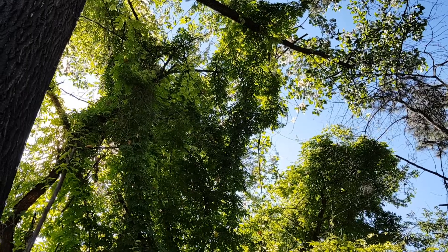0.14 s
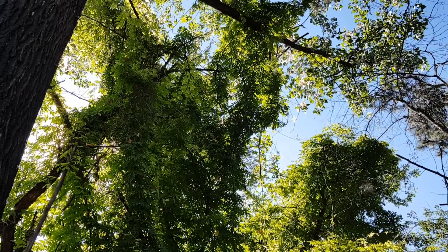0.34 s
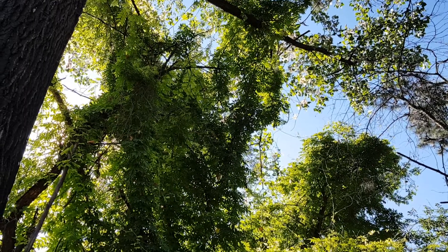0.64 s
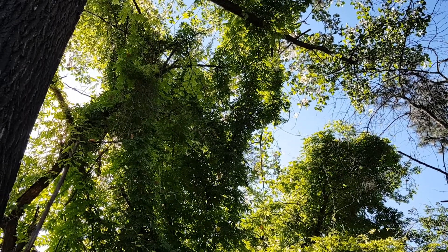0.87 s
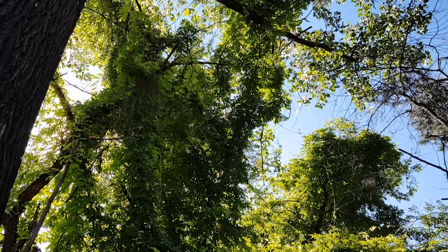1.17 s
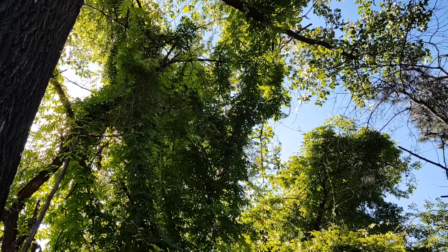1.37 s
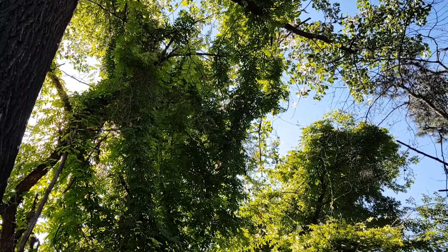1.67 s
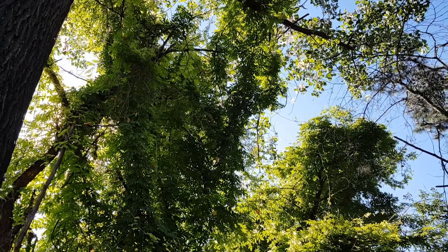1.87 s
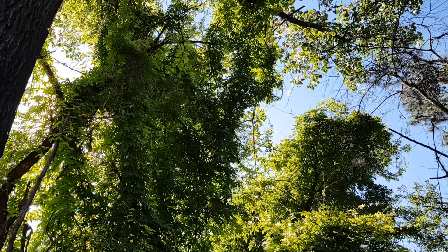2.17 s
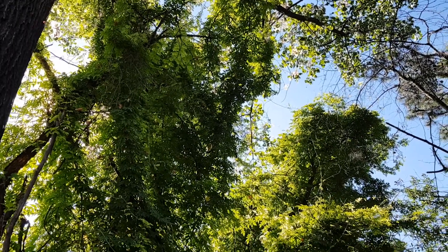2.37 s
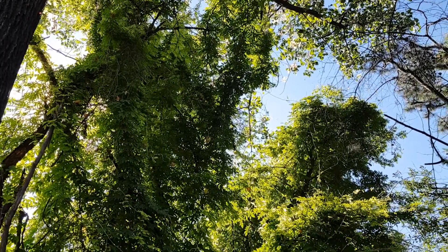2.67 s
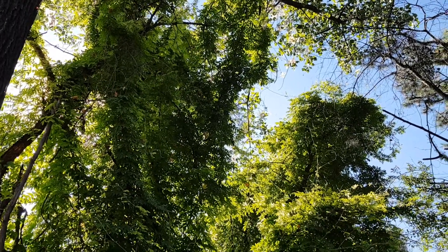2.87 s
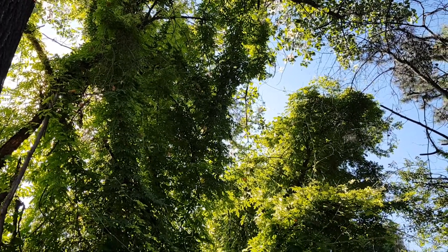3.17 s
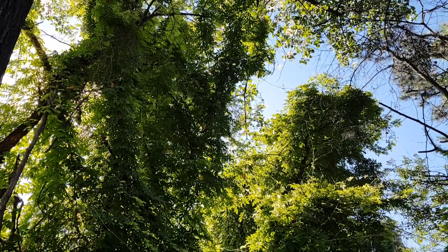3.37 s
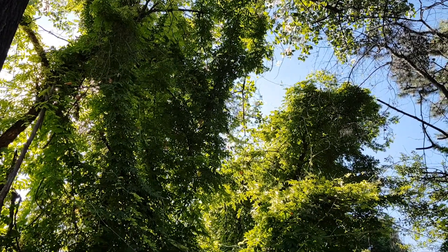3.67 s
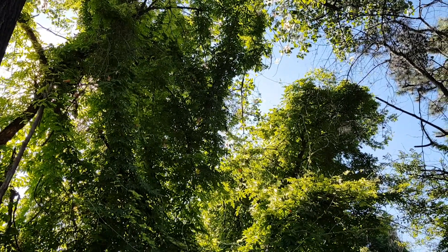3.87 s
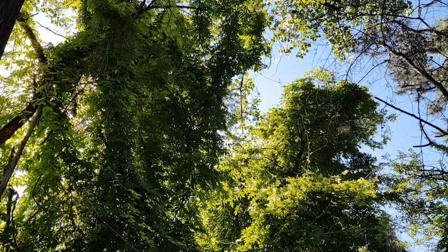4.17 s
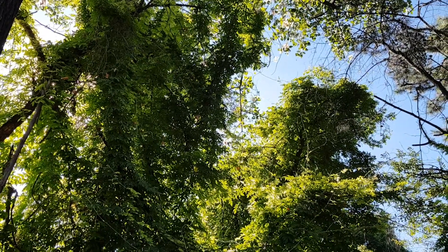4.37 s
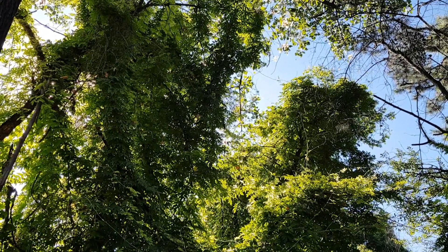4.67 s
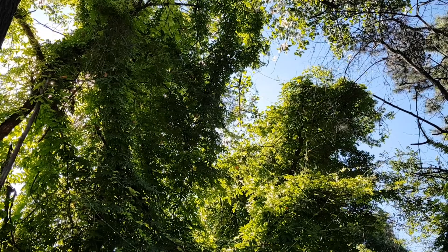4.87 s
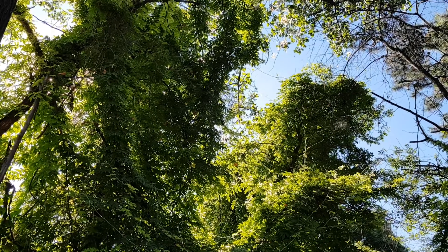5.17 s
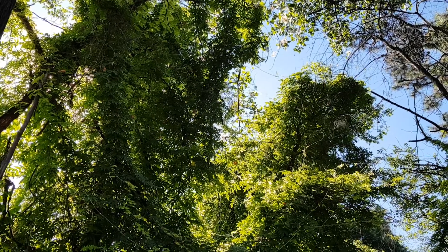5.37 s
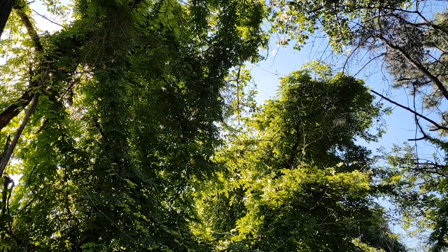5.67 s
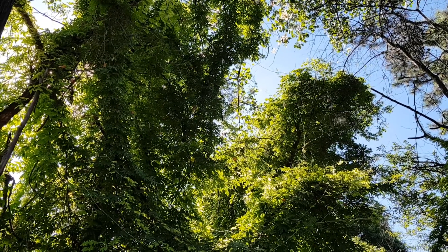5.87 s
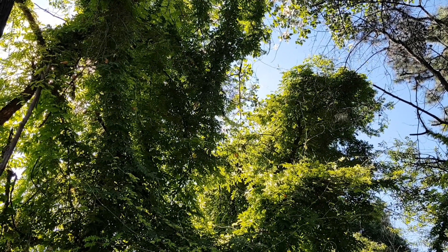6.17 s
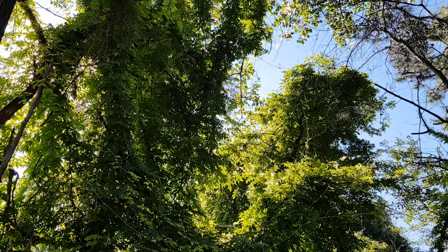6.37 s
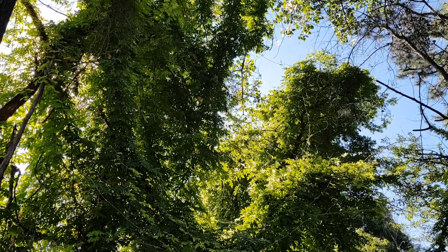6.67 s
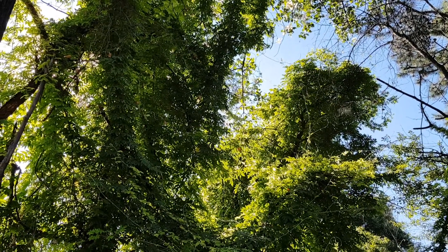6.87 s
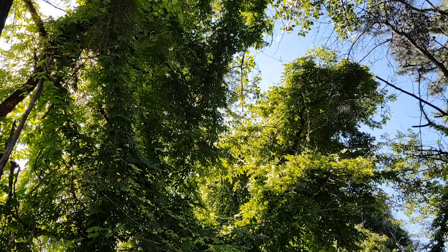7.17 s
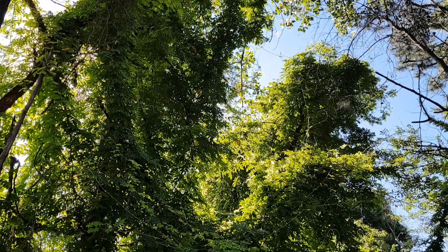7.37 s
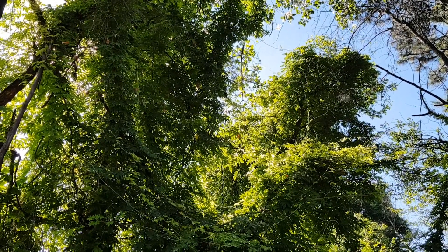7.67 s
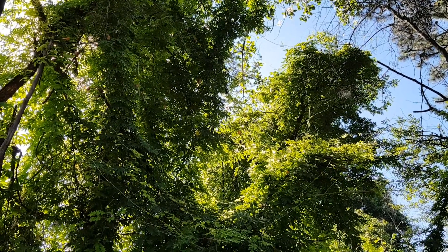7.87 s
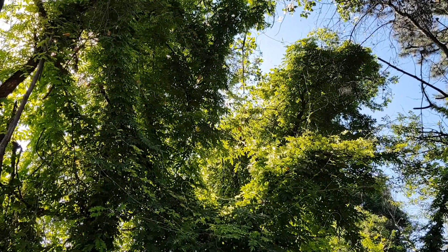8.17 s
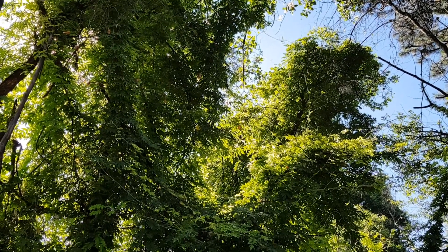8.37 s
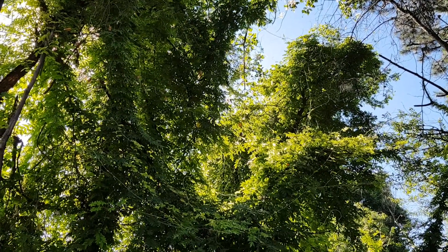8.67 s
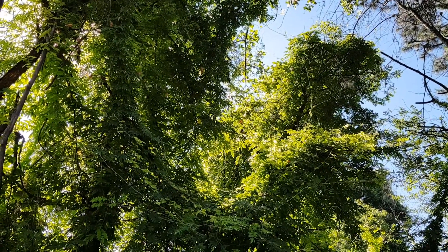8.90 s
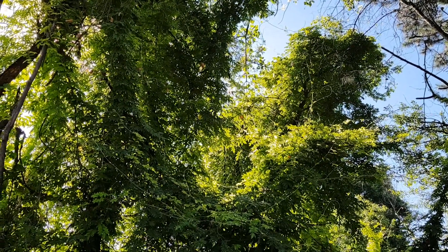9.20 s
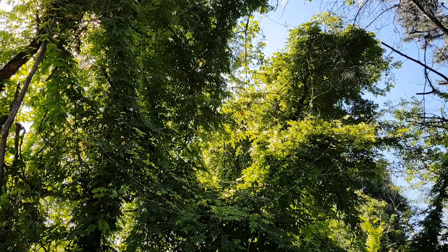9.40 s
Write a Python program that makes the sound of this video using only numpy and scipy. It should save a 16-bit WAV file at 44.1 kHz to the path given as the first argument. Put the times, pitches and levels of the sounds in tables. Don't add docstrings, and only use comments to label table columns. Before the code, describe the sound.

Two spaced microphones under vine-covered trees pick up close cicadas: metallic, needle-like buzzing at around two hundred pulses a second, alternating with lower reedy notes. Short exchanges give way to a sustained song that tires into rattle, then a quieter stretch where the distant chorus shows, then the loudest long song, slowing and unsteady to the end. A faint machine whine, low traffic and brief soft wind thumps lie far below.

```python
import sys
import numpy as np
from scipy import signal
from scipy.fft import rfft, irfft, next_fast_len
from scipy.io import wavfile
from scipy.ndimage import uniform_filter1d, map_coordinates

SR = 44100
rng = np.random.default_rng(int(sys.argv[2]) if len(sys.argv) > 2 else 0)


def store_pcm(level_fs):
    pcm = np.round(np.clip(level_fs, -1, 1) * 32767).astype(np.int16)
    wavfile.write(sys.argv[1], SR, np.atleast_2d(pcm).T)


def volts_from_db(level):
    exponent = np.asarray(level, float) / 20
    return 10 ** exponent


N = 420713

SPACING = 0.167

# (frequency [Hz], level [dB per Hz])
HUM_SPECTRUM = [(12, -52), (20, -8), (43, -2.5), (108, 1), (190, -3.5), (232, -0.5), (357, -8.5), (409, -8),
                (500, -13.5), (650, -15.5), (1100, -120)]
# (frequency [Hz], level [dB per Hz])
RUSTLE_SPECTRUM = [(180, -39), (300, -31), (389, 8.5), (436, -25), (484, 9), (716, 7), (1400, 4),
                   (2400, -4), (3120, -89), (5280, -120)]
HUM_DB, RUSTLE_DB = -51, -56
RUSTLE_FADE = 1.47

# (peak time [s], width [s], level [dB], lower octave level [dB])
WHINE_SWELLS = [(2.1, 0.16, -65, -77), (2.7, 0.24, -57.5, -62), (3.13, 0.064, -59, -85),
                (3.36, 0.064, -59, -84), (3.6, 0.1, -52, -76), (3.76, 0.052, -60, -62),
                (3.98, 0.15, -58, -80), (4.33, .15, -64, -78)]
# (time [s], frequency [Hz])
WHINE_PITCH = [(1.98, 1510), (2.5, 1552), (2.75, 1543), (3.15, 1531), (3.45, 1523), (4.15, 1527),
               (4.55, 1495)]
TWIN_HZ, TWIN_DB = 16, -68.5

# (start [s], end [s], frequency [Hz], level [dB])
FAR_NOTES = [(0, .92, 80.8, -52), (1.502, 1.75, 2040, -60), (2.85, 2.97, 2600, -50.5), (3, 3.6, 240, -61.5),
             (3.3, 3.6, 2640, -54.5), (6.99, 7.606, 399, -68.5), (7.2, 7.37, 3850, -44),
             (7.39, 7.56, 3430, -43.5), (8.007, 8.695, 388, -67), (8.6, 8.712, 4480, -38),
             (8.9, 9.547, 393.5, -70), (9.45, 9.6, 5280, -38), (9.49, 9.6, 5080, -43)]
FLUTTER_DB = 1.5

# (start [s], left level [dB], right level [dB], length [s])
WIND_PUFFS = [(0.876, -48, -41.5, 0.16), (1.157, -52, -46, 0.11), (1.857, -52, -47, 0.036),
              (4.526, -56, -45, 0.092), (5.413, -48, -64, .06), (5.637, -28, -39, 0.057),
              (6.076, -40.5, -56, 0.067), (6.473, -58, -41.5, 0.14), (6.768, -47, -40, 0.1),
              (7.002, -46, -56, 0.23), (7.2, -62, -55, 0.12), (7.36, -48, -54, 0.16),
              (7.506, -52, -62, 0.15), (7.757, -43.5, -55, 0.061), (8.28, -60, -49, 0.042)]

# (frequency [Hz], level [dB per Hz])
DEEP_SPECTRUM = [(880, -83), (1500, -30), (1850, -23.5), (2810, -8), (3570, 2), (4700, 4), (5520, -10.5),
                 (6520, -6), (7400, -13.5), (9620, -41), (16300, -120)]
# (frequency [Hz], level [dB per Hz])
THIN_SPECTRUM = [(4120, -48), (7000, -41), (7160, -36), (7450, -9), (7860, -4), (8560, -1), (9130, -3),
                 (10400, -19), (11500, -18.5), (15000, -36), (22000, -120)]
# (frequency [Hz], level [dB per Hz])
HAZE_SPECTRUM = [(4500, -14), (5500, 3.5), (7000, -2.5), (10000, -10), (11500, 1), (15800, 0.5)]
# (time [s], level [dB])
DEEP_SWELL = [(0, -33.5), (1.35, -33), (1.6, -30), (2.1, -32), (2.5, -32), (3.35, -34.5), (3.75, -32),
              (4.05, -34.5), (4.4, -31.5), (5, -37.5), (5.75, -33.5), (6.5, -34.5), (7, -34.5),
              (7.65, -32.5), (8.4, -33), (9.2, -32.5), (9.54, -31.5)]
# (time [s], level [dB])
THIN_SWELL = [(0, -38), (1.3, -39.5), (1.6, -36), (3.7, -35), (5.8, -35.5), (7.6, -37.5), (9.54, -36)]
HAZE_DB, HAZE_FOLLOWS, HAZE_LAG_S = -37, 0.62, 0.48

# (time [s], rate [cycles a second])
SHRILL_BEAT = [
    [(0, 202.5), (.9, 202), (1.26, 201.7), (1.85, 199.6)],
    [(1.85, 214.6), (2.67, 208.7), (2.95, 203.3), (3.3, 196), (4.75, 165)],
    [(4.75, 191.5), (5.2, 190.5), (5.3, 207.1), (5.88, 202.3)],
    [(5.85, 211), (6.25, 206.2), (6.9, 202.3), (7.3, 197.2), (7.42, 191), (7.51, 192.4), (7.7, 182),
     (8.4, 162), (9.54, 150)],
]
# (time [s], rate [cycles a second])
LOW_BEAT = [
    [(0, 205), (.7, 204.4), (1.25, 203)],
    [(1.25, 202.4), (1.62, 201.5)],
    [(1.55, 214.9), (2, 214.4)],
    [(1.7, 198.5), (2, 199), (2.15, 191), (2.4, 185), (3.5, 170)],
    [(4.55, 191.8), (5.35, 190.3)],
    [(5.45, 212.8), (5.78, 212.5), (5.98, 210.9)],
]
# (start [s], end [s], level [dB], sag [dB a second])
SHRILL_HOLDS = [
    [(0, .16, -26.5, -10), (.385, .55, -26, 0), (.79, .94, -26, 5), (1.15, 1.335, -31, -13),
     (1.59, 1.705, -29, -13)],
    [(1.97, 3.93, -31, 1.2), (3.93, 4.08, -35, 28), (4.08, 4.7, -40, 6)],
    [(4.9, 5.08, -43, 10), (5.33, 5.88, -38, -2)],
    [(5.94, 7, -26, -1), (7, 8.45, -25.5, 2), (8.45, 8.9, -28, 19), (9.03, 9.2, -29.5, 20),
     (9.25, 9.48, -37.5, 7)],
]
# (start [s], end [s], level [dB], sag [dB a second])
LOW_HOLDS = [
    [(.205, .305, -28.5, 14), (.585, .68, -29, -18), (.98, 1.07, -28.5, -26)],
    [(1.401, 1.524, -28, 27.78)],
    [(1.68, 1.904, -32, 7)],
    [(1.8, 1.98, -30, 3), (2.16, 3.35, -34, 6.5)],
    [(4.68, 4.82, -42.5, 5), (5.13, 5.25, -40.5, -19)],
    [(5.56, 5.7, -44, -56), (5.686, 5.9, -32, -4)],
]
# (right microphone delay [ms], left over right [dB], leaf echoes [dB], brightness [dB per octave])
SHRILL_PERCH = [
    (0.06, 0.5, -3, -0.5),
    (-0.085, 1, 3, 15.5),
    (0, -1, 17, 11),
    (0.168, 0, -1, 4.5),
]
# (right microphone delay [ms], left over right [dB], leaf echoes [dB], brightness [dB per octave])
LOW_PERCH = [
    (0.072, .3, -4.5, 1),
    (0.077, .3, -2.5, 2.5),
    (-0.097, 0.33, -3, 4),
    (0.081, 2.4, 1.5, -4),
    (0.0081, 1.5, 7, 4),
    (0.084, 1.8, 1, 11.5),
]
# (scatter of a cycle [us], tires below [cycles a second], second tymbal follows [ms])
SHRILL_NERVE = [
    (3, 190, 2.6),
    (4.5, 207, 2.45),
    (6, 180, 2.55),
    (3.5, 195, 2.55),
]
# (scatter of a cycle [us], tires below [cycles a second], second tymbal follows [ms])
LOW_NERVE = [
    (4, 190, 2.915),
    (4, 190, 2.635),
    (4, 190, 2.335),
    (11, 192, 2.52),
    (8, 170, 2.64),
    (6, 190, 2.37),
]

# (delay [ms], level [dB])
RIB_BUCKLES = [
    [(0, 9), (.36, -3), (1.7, -11), (2.05, 0.5)],
    [(0, -3), (.55, 2.5), (1.2, -5)],
]
# (delay [ms], level [dB])
SAC_PUSHES = [
    [(0, 0)],
    [(0, -4)],
]
# (frequency [Hz], level [dB])
RAISED_RING = [(9500, -43), (10800, -20), (11800, -5.5), (12600, 0.5), (14300, -2.5), (15800, -2.5)]
# (frequency [Hz], level [dB])
LOWERED_RING = [(2600, -64), (3500, -8), (3900, -0.5), (4320, 3), (4620, -8.5), (4920, 0.5), (5600, -11),
                (6300, -11), (6800, -7), (7600, -31)]

SHRILL_SLIP_US, LOW_SLIP_US = 1.7, 12
SHRILL_SWING, LOW_SWING = (120, 270), (190, 200)
SHRILL_STIR, LOW_STIR = 6, 2.5
REST_DB = -56


def unit(x):
    return x / np.sqrt(np.mean(x ** 2, axis=-1, keepdims=True) + 1e-20)


def colour(points, hz):
    f, db = np.transpose(points)
    return volts_from_db(np.interp(np.log(hz + 1), np.log(f + 1), db, left=-100, right=-100))


def curves(rows, span=None):
    s, *cols = np.transpose(rows)
    t = np.arange(N) / SR if span is None else span
    return [np.interp(t, s, c) for c in cols]


def wobble(rate):
    knots = rng.standard_normal(int(N * rate / SR) + 4)
    return map_coordinates(knots, [np.arange(N) * rate / SR])


def filtered(x, response):
    m = next_fast_len(x.shape[-1] + 8192)
    return irfft(rfft(x, m) * response(np.fft.rfftfreq(m, 1 / SR)), m)[..., :x.shape[-1]]


def clicks(at, sizes, size):
    tap = np.floor(at)[:, None] + np.arange(-7, 9)
    away = tap - at[:, None]
    shape = np.sinc(away) * np.cos(np.pi * away / 18) ** 2 * sizes[:, None]
    return np.bincount(np.clip(tap, 0, size).astype(int).ravel(), shape.ravel(), size + 1)[:size]


def tone(start, end, phase):
    t = np.arange(N) / SR
    swell = np.clip(np.minimum(t - start + (start == 0), end - t) / 0.035, 0, 1)
    return np.sqrt(2) * swell * np.sin(phase)


def held(notes, swing, t):
    start, end, db, sag = np.transpose(notes)[:, :, None]
    attack, release = swing
    inside = np.clip(t, start, end)
    shape = db - sag * (inside - start)
    shape = shape - attack * np.maximum(start - t, 0) - release * np.maximum(t - end, 0)
    return np.maximum(shape.max(axis=0), REST_DB)


def all_round(pair, aimed, late_ms):
    turn = lambda hz: np.arccos(np.sinc(2 * hz * SPACING / 343)) / 2
    mid, side = filtered(pair, lambda hz: np.array([np.cos(turn(hz)), np.sin(turn(hz))]))
    ears = np.array([[1], [-1]])
    beam = filtered(np.roll(pair[0], SR), lambda hz: np.exp(-1j * np.pi * hz * late_ms / 1000 * ears))
    aimed = np.clip(aimed, 0, 1)
    return np.sqrt(1 - aimed) * np.array([mid + side, mid - side]) + np.sqrt(aimed) * beam


def hiss(spectrum, aimed):
    noise = all_round(rng.standard_normal((2, N)), aimed, late_ms=0.303)
    return unit(filtered(noise, lambda hz: colour(spectrum, hz)))


def leaves(t60):
    t = np.arange(int(t60 * SR)) / SR
    return unit(rng.standard_normal((2, len(t))) * volts_from_db(-60 * t / t60)) / np.sqrt(len(t))


def air():
    t = np.arange(N) / SR
    hum = volts_from_db(HUM_DB - 1.56 + 0.53 * wobble(3.07)) * hiss(HUM_SPECTRUM, aimed=0.18)
    rustle_db = RUSTLE_DB - RUSTLE_FADE * t + [[1.1], [1.9]]
    return hum + volts_from_db(rustle_db) * hiss(RUSTLE_SPECTRUM, aimed=0.13)


def machine():
    t = np.arange(N) / SR
    top, root = sum(volts_from_db([[db], [low_db]]) * np.exp(-((t - s) / wide) ** 2)
                    for s, wide, db, low_db in WHINE_SWELLS)
    phase = 2 * np.pi * np.cumsum(curves(WHINE_PITCH)[0]) / SR + [[.4], [-.4]]
    span = WHINE_PITCH[0][0], WHINE_PITCH[-1][0]
    whine = volts_from_db(1.8 * wobble(11)) * (top * tone(*span, phase) + root * tone(*span, phase / 2))
    return whine + volts_from_db(TWIN_DB) * tone(*span, phase + TWIN_HZ * 2 * np.pi * t)


def far_notes():
    turns = 2 * np.pi * np.arange(N) / SR
    return sum(volts_from_db(db + FLUTTER_DB * wobble(4)) * tone(start, end, hz * turns + 0.38 * wobble(6.5))
               for start, end, hz, db in FAR_NOTES)


def wind():
    t = np.arange(N) / SR
    gust = sum(volts_from_db([[left], [right]]) * np.exp(-((t - s - wide / 2) / (wide / 2)) ** 2)
               for s, left, right, wide in WIND_PUFFS)
    rumble = [(20, -11), (45, -5), (90, -7.0), (160, -19.5), (300, -36)]  # (frequency [Hz], level [dB])
    return gust * unit(filtered(rng.standard_normal((2, N)), lambda hz: colour(rumble, hz)))


def crowd(body, rate, count, swell_db, jitter, blur, aimed, late_ms):
    sound = np.zeros((2, N))
    for male in range(count):
        period = SR / (rate * (1 + .07 * rng.standard_normal()))
        gaps = period * (1 + jitter * rng.standard_normal(8000) + .012 * wobble(5)[::50][:8000])
        at = np.cumsum(gaps)
        at = at[at < N].astype(int)
        sizes = volts_from_db(2 * rng.standard_normal(8000))[:len(at)]
        train = np.bincount(at, sizes, N) * volts_from_db(swell_db * wobble(2.5))
        echoes = rfft(leaves(blur), 4096)
        even = irfft(echoes / np.abs(echoes))
        sound += signal.oaconvolve(train[None], even, axes=1)[:, :N]
    return unit(filtered(all_round(sound, aimed, late_ms), lambda hz: colour(body, hz)))


def choruses():
    t = np.arange(N) / SR
    deep_db, thin_db = curves(DEEP_SWELL)[0], curves(THIN_SWELL)[0]
    near = volts_from_db(held(sum(SHRILL_HOLDS, []), SHRILL_SWING, t)) + volts_from_db(held(sum(LOW_HOLDS, []), LOW_SWING, t))
    near_db = 20 * np.log10(uniform_filter1d(near, size=round(HAZE_LAG_S * SR)))
    haze_db = HAZE_DB + HAZE_FOLLOWS * (near_db - near_db.mean())
    deep = crowd(DEEP_SPECTRUM, 205, count=7, swell_db=3, jitter=.008, blur=.03, aimed=0.15, late_ms=0.33)
    thin = crowd(THIN_SPECTRUM, 250, count=6, swell_db=-1.5, jitter=.06, blur=.012, aimed=0.26, late_ms=0.025)
    far = volts_from_db(deep_db + [[3.2], [.9]]) * deep + volts_from_db(thin_db + [[4.5], [.9]]) * thin
    return far + volts_from_db(haze_db) * hiss(HAZE_SPECTRUM, aimed=0.44)


def phrase(beat, nerve, notes, perch, body, tymbals, polarity, swing, slip_us, stir, t60):
    start, stop = round(beat[0][0] * SR), min(round(beat[-1][0] * SR), N)
    t = np.arange(start, stop) / SR
    rate = curves(beat, t)[0]
    steady_us, tires, follow_ms = nerve
    late_ms, pan_db, wet_db, bright_db = perch
    scatter_us = steady_us + slip_us * np.maximum(tires - rate, 0)

    cycles = np.cumsum(rate) / SR
    at = np.interp(np.arange(1, int(cycles[-1])), cycles, np.arange(len(t)))
    k = at.astype(int)
    chance = rng.standard_normal((2000, 12))[:len(at)].T
    slip = scatter_us[k] * SR / 1090000.0
    at = at + np.cumsum(chance[0] * slip)
    second = at + follow_ms * SR / 1000 + 0.099 * chance[1] * slip
    tired_db = .5 + np.minimum(scatter_us[k] / 60, 1.5)
    stretch = 1 + 0.014 * wobble(6)[start + k]

    woods = []
    for side in range(2):
        stirring = np.array([wobble(stir)[start + k] for path in range(4)])
        woods.append((stirring, [leaves(t60) for path in range(4)]))

    heard = np.zeros((2, len(t)))
    for side, (times, ribs) in enumerate(zip((at, second), tymbals)):
        ms, db = np.transpose(ribs)[:, :, None]
        rib_slip = .5 * (ms > 0) * slip * chance[4 + 4 * side:][:len(ms)]
        buckles = times + ms * stretch * SR / 1000 + rib_slip
        sizes = polarity ** side * volts_from_db(db + tired_db * chance[2 + side])
        for ear, late in enumerate((-.5 * late_ms, .5 * late_ms)):
            heard[ear] += clicks(buckles.ravel() + (1 + late) * SR / 1000, sizes.ravel(), size=len(t))
        stirring, paths = woods[side * (polarity > 0)]
        stirring = stirring + scatter_us[k] / 45 * rng.standard_normal((4, 2000))[:, :len(k)]
        strength = polarity ** side * np.linalg.norm(sizes, axis=0)
        for share, path in zip(stirring / np.linalg.norm(stirring, axis=0), paths):
            train = clicks(times + SR / 1000, share * strength, size=len(t))
            heard += volts_from_db(wet_db) * signal.oaconvolve(train[None], path, axes=1)[:, :len(t)]

    edge = np.minimum(t - t[0], t[-1] - t + (stop == N)) / 0.014
    fade = np.clip(edge + (start == 0) * (t < .1), 0, 1)
    ring = unit(filtered(heard, lambda hz: colour(body, hz) * volts_from_db(bright_db * np.log2(hz + 1))))
    voice = ring * volts_from_db(held(notes, swing, t)) * fade
    return np.pad(voice * volts_from_db([[pan_db / 2], [-pan_db / 2]]), ((0, 0), (start, N - stop)))


def near_males():
    shrill = sum(phrase(*p, RAISED_RING, RIB_BUCKLES, 1, SHRILL_SWING, SHRILL_SLIP_US, SHRILL_STIR, t60=.03)
                 for p in zip(SHRILL_BEAT, SHRILL_NERVE, SHRILL_HOLDS, SHRILL_PERCH))
    low = sum(phrase(*p, LOWERED_RING, SAC_PUSHES, -0.99, LOW_SWING, LOW_SLIP_US, LOW_STIR, t60=0.033)
              for p in zip(LOW_BEAT, LOW_NERVE, LOW_HOLDS, LOW_PERCH))
    return volts_from_db(5.0) * shrill + volts_from_db(8.5) * low


def scene():
    return air() + machine() + far_notes() + wind() + choruses() + near_males()


def top_cut(x):
    return signal.sosfilt(signal.butter(12, 15750, fs=SR, output="sos"), x)


def record(dry):
    mix = filtered(dry, lambda hz: hz < 15750)
    return top_cut(mix)


dry = scene()
out = record(dry)
store_pcm(out)
```